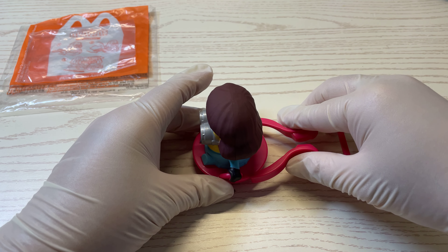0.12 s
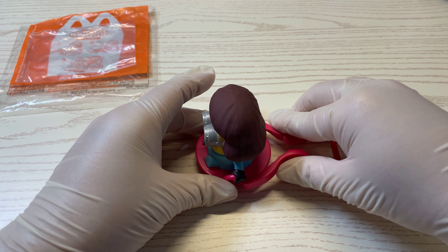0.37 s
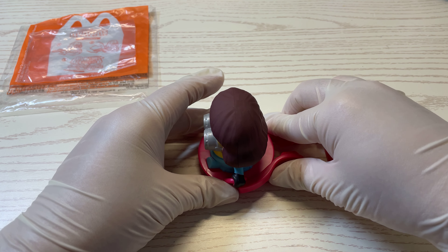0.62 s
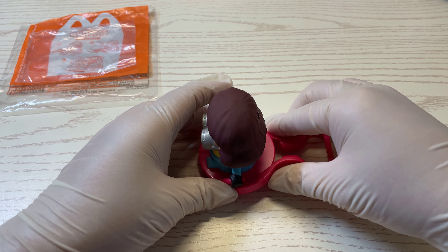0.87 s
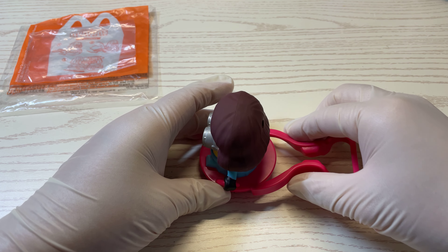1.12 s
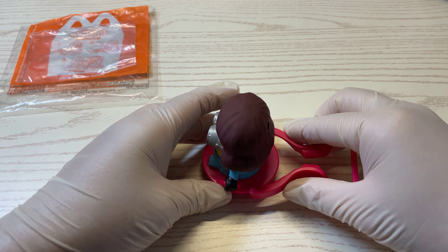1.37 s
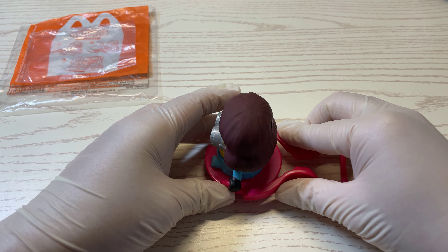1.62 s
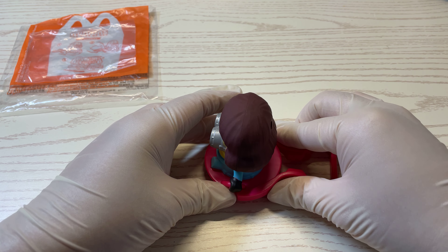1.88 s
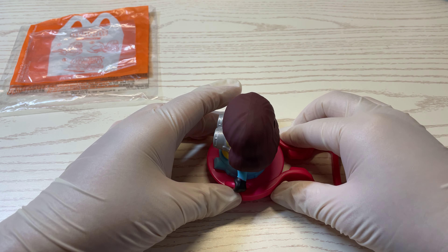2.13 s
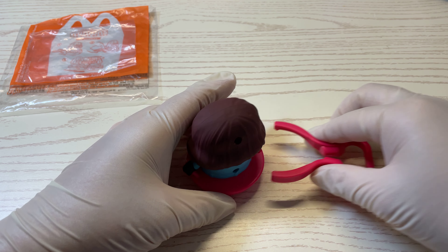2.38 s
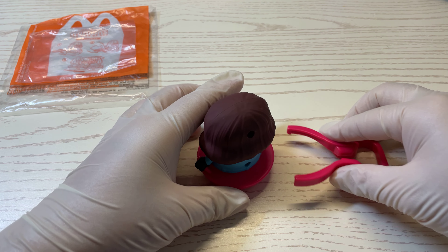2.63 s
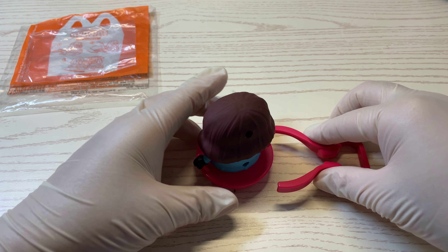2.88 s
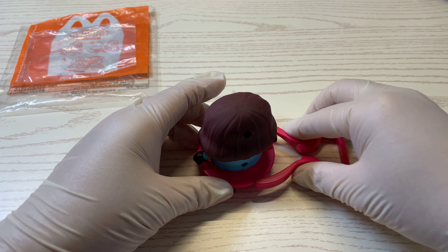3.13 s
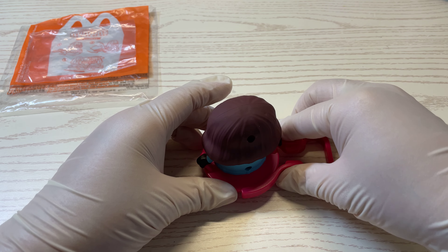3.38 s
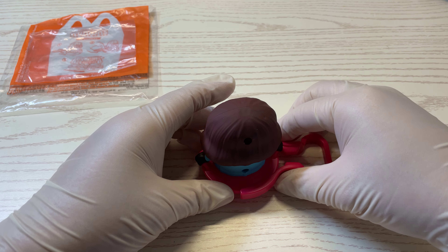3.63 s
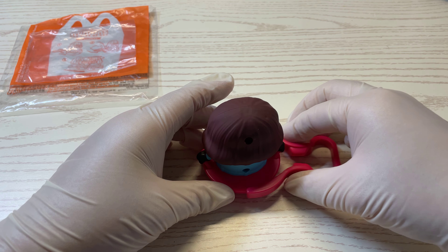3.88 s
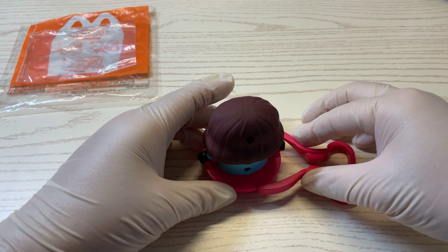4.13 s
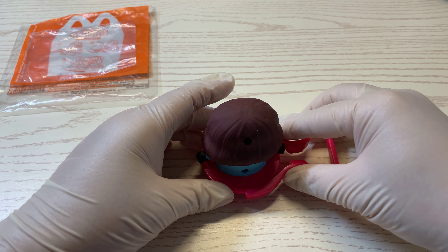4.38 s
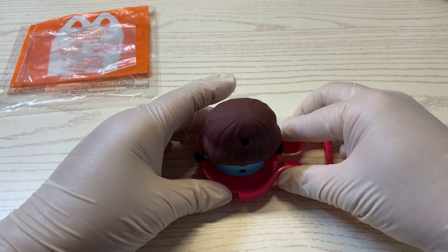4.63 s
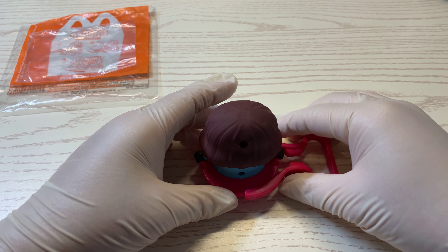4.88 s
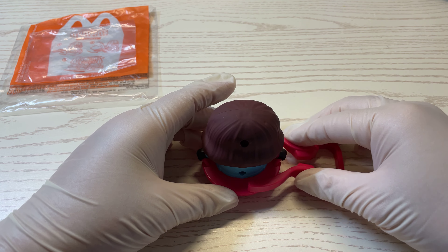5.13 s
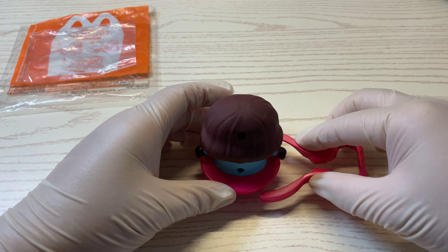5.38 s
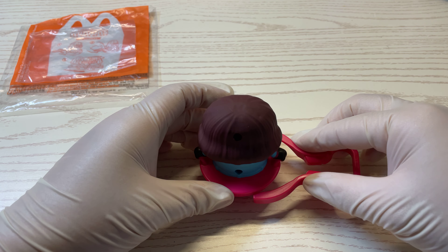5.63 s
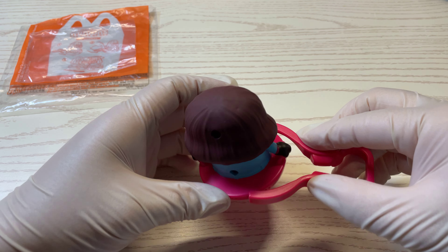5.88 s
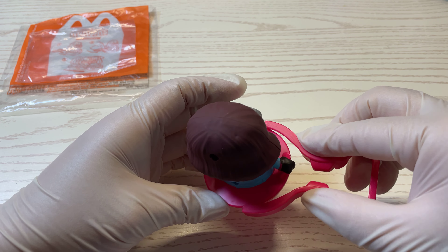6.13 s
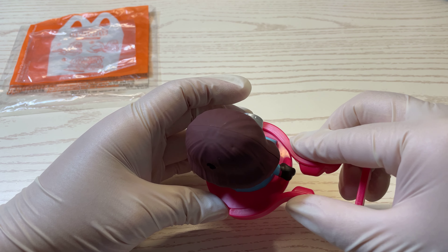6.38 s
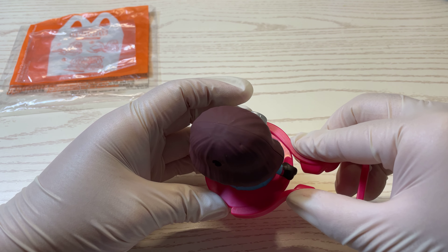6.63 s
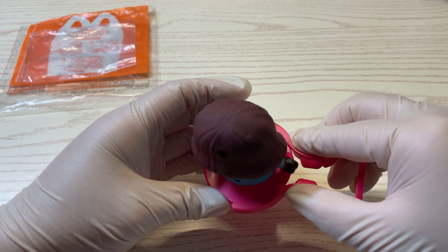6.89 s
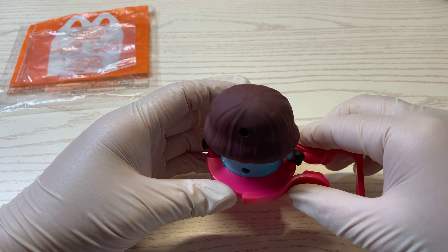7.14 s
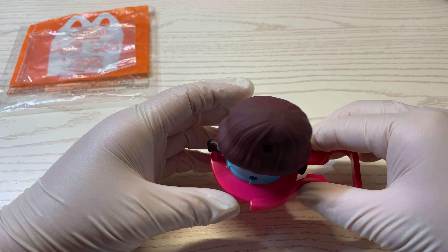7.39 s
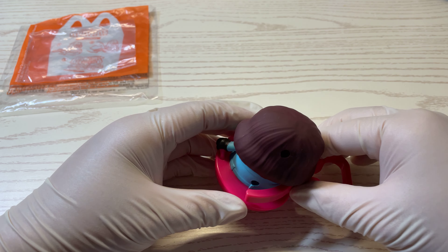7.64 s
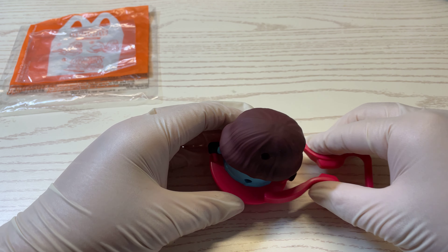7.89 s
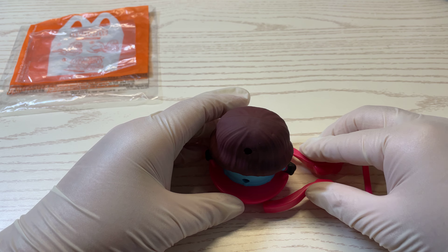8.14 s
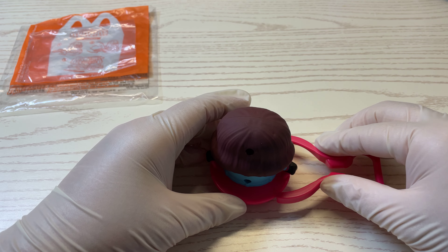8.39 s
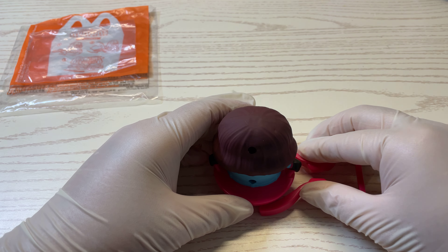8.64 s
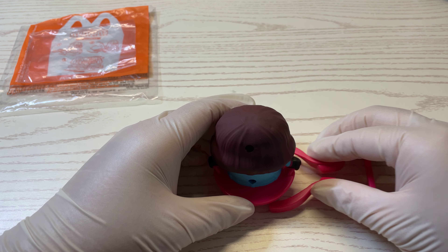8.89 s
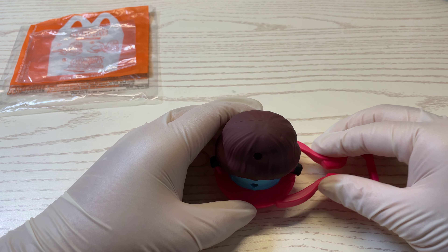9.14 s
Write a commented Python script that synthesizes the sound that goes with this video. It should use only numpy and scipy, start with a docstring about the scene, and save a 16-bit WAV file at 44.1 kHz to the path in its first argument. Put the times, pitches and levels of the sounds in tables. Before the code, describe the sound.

Irregular plastic clicks and tiny rattles, heard close and dry with a slight small-room tail. Soft thumps pass into a wooden table, and the toy's base drags in short hollow squeaks. Rubber gloves rub faintly throughout. Two loud crisp snaps stand out in the middle, and another cluster of snaps and scraping comes late, before a few final taps. A faint low room rumble stays beneath.

```python
"""A quiet room with a wooden table: gloved hands fit a springy plastic clamp round a small hollow plastic toy.
Contacts are clicks and short rattles that ring the modes of the thin shell, the hollow and the table top.
Random slips drag the base now and then; grainy noise and faint scuffs are the gloves, rubbing throughout.
Faint gliding sines whistle high up, and shaped noise lays a low rumble under it all."""
import sys
import numpy as np
from scipy import signal
from scipy.fft import rfft, irfft
from scipy.io import wavfile

SR = 44100
rng = np.random.default_rng(int(sys.argv[2]) if len(sys.argv) > 2 else 0)


def wrap_up_sound(samples):
    """Save the sound to the file named by the first command line argument, as 16-bit audio."""
    columns = np.atleast_2d(samples).T
    # keep every value between -1 and 1, then stretch to whole-number steps
    tamed = np.clip(columns, -1, 1)
    steps = np.round(tamed * 32767).astype(np.int16)
    wavfile.write(sys.argv[1], SR, steps)


def nominal_scale(level):
    """Amplitude ratio for a level in decibels (scalar or array-like)."""
    x = np.asarray(level, float) / 20
    return 10 ** x


N = 408366   # length [samples]


def rms_one(x):
    """Scales to rms 1."""
    return x / np.sqrt(np.mean(x ** 2) + 1e-20)


def in_time(rows):
    """Draws each column of a (time, values...) table as a curve, one value a sample."""
    time_s, *columns = np.transpose(rows)
    return [np.interp(np.arange(N) / SR, time_s, column) for column in columns]


def fade(x, seconds):
    """One-pole smoothing; a unit click spreads over the given time with area 1."""
    r = np.exp(-1 / (seconds * SR))
    return signal.lfilter([1 - r], [1, -r], x + 1e-18)


def high_pass(x, hz):
    """Small parts radiate little below their lowest modes."""
    return signal.sosfilt(signal.butter(3, hz, "high", fs=SR, output="sos"), x)


def octaves(modes, from_hz):
    """Distance of each mode from one pitch, or from a pitch given per blow [octaves]."""
    return np.log2(np.array(modes)[:, 0] / np.reshape(from_hz, (-1, 1)))


def coloured(spectrum):
    """Noise with the given spectrum; rms 1."""
    hz, db = np.transpose(spectrum)
    bins_hz = np.arange(1, N // 2 + 2) * SR / N
    gain = nominal_scale(np.interp(np.log(bins_hz), np.log(hz), db))
    return rms_one(irfft(rfft(rng.standard_normal(N)) * gain, N))


def grains(per_s, spread_db):
    """Stick-slip: random small clicks of uneven size; rms 1."""
    sizes = nominal_scale(spread_db * np.minimum(rng.exponential(1, N), 4)) * rng.choice([-1, 1], N)
    return rms_one(sizes * (rng.random(N) < per_s / SR))


def ring(force, hz, t60):
    """A resonating mode: a unit click sets a sine of height 1 ringing."""
    r, w = nominal_scale(-60 / (t60 * SR)), 2 * np.pi * hz / SR
    return signal.lfilter([0, np.sin(w)], [1, -2 * r * np.cos(w), r * r], force + 1e-18)


def struck(modes, when_s, colour_db, peak_db, scatter_db, click, rattle, rattle_s, rise_s):
    """Each blow is a click and a rattle that swells and dies, shared among the modes; returns rows click, rattle."""
    hz, level_db, t60 = np.transpose(modes)
    at = np.round(when_s * SR).astype(int)
    chance = rng.standard_normal((len(at), len(hz)))
    share = nominal_scale(level_db + colour_db + scatter_db * chance)
    share /= np.sqrt(np.sum(share ** 2, axis=1, keepdims=True))
    # neighbouring modes swing in opposition
    share *= nominal_scale(peak_db)[:, None] * (-1) ** np.arange(len(hz))
    # at rattle 1, the energy of a unit click
    chatter = rattle * np.sqrt(2 * (rattle_s + rise_s) * SR) * rng.standard_normal(N)
    out = 0
    for k in range(len(hz)):
        clicks = np.zeros(N)
        clicks[at] = share[:, k]
        rattling = fade(fade(clicks, rise_s), rattle_s) * chatter
        out = out + ring(np.array([click * clicks, rattling]), hz[k], t60[k])
    return out


def rubbed(modes, force, colour_db=0):
    """A continuing force keeps the modes ringing; rms 1."""
    hz, db, t60 = np.transpose(modes)
    gain = nominal_scale(db + np.ravel(colour_db)) * (-1) ** np.arange(len(hz))
    return rms_one(sum(g * ring(force, f, t) for g, f, t in zip(gain, hz, t60)))


# spectrum of the low rumble: (frequency [Hz], relative level [dB])
RUMBLE_SPECTRUM = [(13, -45.5), (22, -32), (44, -1), (80, -7), (115, -3), (189, -29), (256, -24.5),
                   (524, -28.5), (585, -36), (771, -29), (910, -28.5), (1270, -32), (5610, -72),
                   (13200, -62), (16000, -79)]


def room_tone():
    """Steady noise, heaviest in the bass, at -50.5 dB rms."""
    return nominal_scale(-50.5) * coloured(RUMBLE_SPECTRUM)


def room(x):
    """A diffuse tail: quick echoes off table and hands, then the slower room, a little dull."""
    near_t60_s, room_t60_s, far_db, wall_cut_hz = 0.087, 0.28, -9.5, 9000
    t = np.arange(SR // 2) / SR
    decay = nominal_scale(-60 * t / near_t60_s) + nominal_scale(far_db - 60 * t / room_t60_s)
    tail = rng.standard_normal(len(t)) * decay * (t > .004)
    tail = fade(tail, 1 / (2 * np.pi * wall_cut_hz))
    tail = tail - 0.3 * fade(tail, 1 / (2 * np.pi * 2500))     # the bass comes back weaker
    return signal.fftconvolve(x, tail / np.sqrt(np.sum(tail ** 2)))[:N]


# thin high whistles: (start [s], end [s], first pitch [Hz], last pitch [Hz], peak level before the waver [dB])
WHISTLE_GLIDES = [(0.55, 0.94, 4630, 4900, -81), (0.927, 1.2, 4880, 4830, -72),
                  (1.167, 1.27, 7700, 7650, -88), (1.566, 1.635, 7650, 7650, -84),
                  (1.865, 1.968, 7650, 7700, -90)]


def whistles():
    """Faint sines that glide a little and waver in strength."""
    out = np.zeros(N)
    waver = 1 + .2 * rms_one(fade(fade(rng.standard_normal(N), .01), .01))
    for start_s, end_s, from_hz, to_hz, db in WHISTLE_GLIDES:
        a, b = round(start_s * SR), round(end_s * SR)
        phase = 2 * np.pi * np.cumsum(np.linspace(from_hz, to_hz, b - a)) / SR
        out[a:b] += nominal_scale(db) * np.hanning(b - a) ** 0.065 * np.sin(phase)     # nearly flat, soft ends
    return out * waver


def lead_in():
    """Parts slide into each contact: a swell grows towards it and lets go within milliseconds."""
    swell_s, swell_db, follows = 0.019, -63, 0.1     # follows: share of the contact's dB level
    time_s, shell_db = np.transpose(TOY_CONTACTS)[:2]
    clicks = np.zeros(N)
    clicks[np.round(time_s * SR).astype(int)] = nominal_scale(swell_db + follows * shell_db)
    swell = swell_s * SR * fade(clicks[::-1], swell_s)[::-1]     # smoothed backwards in time
    return fade(swell, 0.004)


# modes of the wooden table top: (frequency [Hz], relative level [dB], decay by 60 dB [s])
TABLE_MODES = [(89, -6.5, 0.15), (120, -1.5, 0.06), (215, -4.5, 0.03), (378.6, -4, 0.04),
               (433, -6.5, 0.079), (560, -2.5, 0.031), (780, -0.5, 0.018)]
# modes of the air and body of the hollow toy: (frequency [Hz], relative level [dB], decay by 60 dB [s])
HOLLOW_MODES = [(985, 0, .04), (1180, -3, .03), (1300, -3, .035), (1390, 0, .08), (1455, 0, .075),
                (1560, 0, .04), (1650, 0, .045), (1820, 0, .04)]
# spectrum of glove on plastic: (frequency [Hz], relative level [dB])
GLOVE_SPECTRUM = [(1180, -32), (2000, -0.5), (2860, -4), (3230, -7.5), (4990, -12), (5630, -19),
                  (7000, -17), (8200, -12), (9500, -19.5), (16000, -20)]
# light rubbing, before its waver: (time [s], hiss level [dB], scuff level [dB])
GLOVE_RUBBING = [(0.0, -76, -59.5), (0.22, -76, -71), (0.44, -68, -63), (0.57, -86, -66),
                 (0.85, -73.5, -64), (1.05, -63, -66), (1.5, -87.5, -71), (1.7, -64.5, -64),
                 (1.92, -85, -67), (2.28, -68, -61), (2.36, -48, -42.5), (2.56, -69, -54.5),
                 (2.85, -68, -61.5), (3.06, -86, -59), (3.35, -67.5, -65), (3.6, -75.5, -64.5),
                 (4.3, -67, -56.5), (4.65, -77.5, -66.5), (5.07, -75, -59), (5.18, -61, -49),
                 (5.35, -72.5, -75.5), (5.6, -82.5, -69.5), (6.1, -80.5, -69), (6.4, -75.5, -67.5),
                 (6.55, -86, -73), (6.9, -79.5, -71.5), (7.5, -84, -70.5), (7.62, -55, -68),
                 (8.0, -82.5, -65), (8.3, -82, -70.5), (8.56, -69.5, -59.5), (8.75, -71, -67.5),
                 (8.86, -81.5, -68), (8.95, -67, -62), (9.26, -73.5, -63)]


def rubbing():
    """Rubber on plastic hisses in grains; light sliding scuffs hollow and table faintly."""
    fidget_s = .03
    fidget_db = 3.0 * rms_one(fade(fade(rng.standard_normal(N), fidget_s), fidget_s))     # random waver
    hiss_db, scuff_db = in_time(GLOVE_RUBBING) + fidget_db
    graininess = rms_one(3.0 + 1.5 * fade(np.abs(grains(per_s=72, spread_db=7.5)), .002))
    hiss = coloured(GLOVE_SPECTRUM) * graininess
    slips = grains(per_s=3700, spread_db=0.0)
    scuff = rms_one(rubbed(HOLLOW_MODES, slips) + 1.3 * rubbed(TABLE_MODES[2:], slips))
    return (nominal_scale(hiss_db) + lead_in()) * hiss + nominal_scale(scuff_db) * scuff


def slide(time_s, length_s, *db):
    """A slide builds up, then lets go: rows for its start, top and end."""
    rise_share, start_db, end_db = 0.32, -16.5, -25.5     # levels relative to the top
    start_s = time_s - rise_share * length_s
    return [(start_s, *np.add(db, start_db)), (time_s, *db), (start_s + length_s, *np.add(db, end_db))]


# modes of the thin plastic shell: (frequency [Hz], relative level [dB], decay by 60 dB [s])
SHELL_MODES = [(2000, -2, .005), (2300, -2, .006), (2600, -3, .007), (2850, -2, .006), (3150, -10, .025),
               (3400, -2, .006), (3600, -8, .018), (3850, -2, .006), (4150, -3, .008), (4500, 0, .004),
               (4900, -1, .005), (5300, -2, .006), (5800, 0, .004), (6420, -1, .005), (7050, 1, .003),
               (7700, 0, .004), (8500, 2, .0025), (9500, 1, .0035), (10400, 2, .0025), (11400, 2, .002),
               (12400, 1, .002), (13400, 0, .002), (14400, 1, .003), (15400, -1, .002), (16200, -4, .003)]
# two long rasps of the base under load, each: (time [s], shell level [dB], hollow level [dB], table level [dB])
BASE_RASPS = [
    [(2.29, -79, -73, -69), (2.312, -85, -42, -48), (2.376, -38.5, -30, -36.5), (2.422, -40.5, -29, -41),
     (2.462, -96, -47, -55), (2.482, -52, -32.5, -43.5), (2.54, -50, -36, -32), (2.62, -74, -77, -54.5)],
    [(8.02, -47, -47.5, -46), (8.072, -41.5, -20.5, -27.5), (8.086, -35.5, -32, -32.5),
     (8.128, -53, -39.5, -33.5), (8.188, -69, -51.5, -50), (8.21, -68, -60, -52)],
]
# short slides of base or clamp:
# (time of most load [s], length [s], shell level [dB], hollow level [dB], table level [dB])
SHORT_SLIDES = [(1.17, 0.088, -62, -48, -42), (2.693, 0.06, -44, -25.5, -35.5), (3.03, 0.11, -77, -63, -66),
                (3.177, 0.25, -63, -53, -51), (3.398, 0.11, -51.5, -43.5, -47),
                (3.711, 0.19, -69.5, -53, -51), (4.008, 0.18, -56.5, -41, -83),
                (4.097, 0.03, -49, -30, -37), (4.379, 0.17, -52.5, -45.5, -66),
                (4.886, 0.048, -59, -45, -62), (4.964, 0.17, -58, -49, -44.5),
                (5.956, 0.17, -60.5, -69, -66), (7.07, .12, -72, -74, -64),
                (7.679, 0.046, -33.5, -30.5, -52), (7.883, 0.12, -48, -35, -30.5),
                (8.587, 0.07, -70, -53, -49), (8.923, 0.16, -59, -52, -53)]


def dragging():
    """One stream of slips drives shell, hollow and table; sliding favours the shell's low squeak and open hollow."""
    slips = grains(per_s=2500, spread_db=4.0)
    squeak_db = 12.0 * np.exp(-(octaves(SHELL_MODES, 3150) / 0.036) ** 2)
    squeak_db = squeak_db - 9.0 * np.abs(octaves(SHELL_MODES, 3300))
    squeak = high_pass(rubbed(SHELL_MODES, slips, squeak_db), 1900)
    scrape = high_pass(rubbed(SHELL_MODES, slips, -3.0 * octaves(SHELL_MODES, 3600)), 1900)
    singing = high_pass(rubbed(HOLLOW_MODES, slips, -32 * np.abs(octaves(HOLLOW_MODES, 1420))), 850)
    scuff = rubbed(HOLLOW_MODES, fade(slips, 0.0006)) + 0.19 * rubbed(TABLE_MODES[4:], slips)
    scuff = high_pass(scuff, 510)
    table = rubbed(TABLE_MODES, fade(fade(slips, 0.0002), 0.0002))     # the table feels only the slow part
    out, t = 0, np.arange(N) / SR
    for rows in BASE_RASPS + [slide(*row) for row in SHORT_SLIDES]:
        sliding = fade(1. * (t > rows[0][0]) * (t < rows[-1][0]), 0.0013)
        shell_db, hollow_db, table_db = in_time(rows)
        # a light slide scuffs broadly, a heavy one sings in the hollow
        load = np.clip((hollow_db + 50) / 16, 0, 1)
        hollow = np.sqrt(load) * singing + np.sqrt(1 - load) * scuff
        shell = np.sqrt(load) * squeak + np.sqrt(1 - load) * scrape
        out = out + sliding * (nominal_scale(shell_db) * shell + nominal_scale(hollow_db) * hollow + nominal_scale(table_db) * table)
    return out


# thumps into the table:
# (time [s], relative level [dB], tilt towards the upper modes [dB], upper mode favoured [Hz])
TABLE_THUMPS = [(0.003, -34.5, 21, 433), (1.163, -28, -35, 447), (1.208, -32, 2, 353),
                (1.312, -23.5, 0, 336), (1.803, -34, -16, 365), (2.226, -36.5, -2, 544),
                (2.325, -23.5, 7, 545), (2.472, -19, -11, 420), (2.69, -14.5, -12, 647),
                (2.817, -31.5, -7, 400), (3.199, -34, -16, 560), (3.402, -28.5, -11.5, 590),
                (3.688, -36, 0, 456), (3.846, -36.5, -17.5, 388), (4.1, -24, -9, 415),
                (4.376, -21, -6, 355), (4.408, -30.5, -7.5, 433), (4.604, -45.5, 0, 523),
                (4.885, -42, 6, 430), (4.951, -34.5, 6, 425), (5.002, -36, 2, 430), (5.172, -29.5, -8, 397),
                (7.594, -22.5, 0.5, 754), (7.867, -17.5, 2, 570), (7.883, -14, -19.5, 590),
                (8.029, -23, 3, 730), (8.049, -31, -4, 424), (8.481, -39, 6, 463), (8.56, -36.5, 2.5, 780),
                (8.95, -33.5, 5.5, 350), (9.142, -27, -0.5, 433), (9.244, -42, 5, 799)]


def thumps():
    """Soft, slow blows on the table top; harder ones reach its upper modes."""
    time_s, db, upper_db, upper_hz = np.transpose(TABLE_THUMPS)
    hardness_db = upper_db[:, None] * np.clip(octaves(TABLE_MODES, 160), 0, 1)
    spot_db = 10.0 * np.exp(-(octaves(TABLE_MODES, upper_hz) / 0.17) ** 2)
    blows = struck(TABLE_MODES, time_s, hardness_db + spot_db, db - 2.5, scatter_db=2.0,
                   click=0.88, rattle=0.91, rattle_s=0.018, rise_s=0.0012)
    return fade(blows, 0.000043)     # softens the top


# contacts on the toy: (time [s], relative shell level [dB], tilt towards the top treble [dB],
# relative hollow level [dB], hollow pitch [Hz])
TOY_CONTACTS = [(0.0834, -29.5, -16, -44.5, 1510), (0.151, -50, -18, -57, 1530),
                (0.4797, -27, -14.5, -46, 1710), (0.6265, -36, -5, -51.5, 1620),
                (0.673, -39, -16, -51.5, 1500), (0.719, -53, -35, -74, 1450),
                (0.9308, -39.5, -11, -49.5, 1530), (0.9858, -45, -16, -51.5, 1310),
                (1.0195, -37, -25, -49.5, 1040), (1.1494, -44, -12, -45.5, 1380),
                (1.27, -41.5, -22, -59, 1880), (1.3007, -31.5, -9, -34, 1250),
                (1.3347, -40, -26, -78, 1330), (1.476, -38.5, -9, -72, 1510), (1.7013, -24, 3.5, -48, 1720),
                (1.7896, -29.5, -16, -49.5, 1900), (1.818, -39.5, -5, -53, 1870),
                (1.8783, -52, -23, -58, 1900), (1.926, -55.5, -30, -63, 1870), (1.9995, -50, -7, -58, 1800),
                (2.078, -38, 0, -51, 1700), (2.1924, -45.5, -10, -51, 1140), (2.3137, -24, 0, -33, 1230),
                (2.465, -20, -5, -26, 1580), (2.526, -37, -5, -40, 1380),
                (2.6756, -22.5, -16.5, -20.5, 1370), (2.8095, -50, -34, -52, 1550),
                (2.9502, -53, -57, -50, 940), (3.004, -38.5, -63, -47, 1280),
                (3.0965, -46.5, -11, -51, 1460), (3.1656, -34, -14, -48, 1060),
                (3.1855, -31.5, -9, -52, 1520), (3.2116, -28, -14.5, -44.5, 1120),
                (3.4045, -23.5, -23, -48, 1900), (3.8877, -46, -29, -53, 1590),
                (3.9704, -46, -29, -59, 1560), (4.0698, -38.5, -21, -60, 1240), (4.0985, -13, 1, -37, 980),
                (4.1114, -22.5, -15, -34, 1110), (4.142, -28, -10, -48, 1590), (4.2238, -28, -7, -49, 1560),
                (4.31, -43, -13, -52, 950), (4.3747, 4.5, 1.5, -22.5, 1414),
                (4.6092, -50, -32, -53.5, 1545), (4.87, -41.5, -36, -40, 1680),
                (4.9427, -41, -17, -44, 1386), (4.994, -40, -12, -46.5, 1670),
                (5.016, -40.5, -30, -48, 947), (5.1545, -24, -25, -52.5, 1540),
                (5.1731, -18, -7.5, -33, 1550), (5.3868, -37.5, -25.5, -43.5, 1300),
                (5.4151, -19, -5, -39.5, 1287), (5.512, -37.5, -16.5, -50.5, 1377),
                (5.7825, -3, 4, -33.5, 1316), (5.923, -48.5, -3.5, -63.5, 1384),
                (6.4305, -34, -13, -50.5, 1652), (6.643, -53.5, -13.5, -62, 1396),
                (7.4589, -57.5, -5, -62, 1277), (7.5934, 3, -1, -24.5, 1288),
                (7.6593, -28, -4, -37.5, 1636), (7.6819, -15.5, -6, -32, 1214),
                (7.745, -37, -11, -60.5, 1360), (7.8636, -20, -16, -25.5, 1650),
                (7.939, -33, -24.5, -56, 1390), (8.019, -19.5, 0, -57, 1400), (8.0272, -14, -7, -37, 957),
                (8.0635, -23, -27, -30, 1390), (8.0857, -20, -38, -28, 1530),
                (8.0993, -21.5, -34, -29.5, 1180), (8.1528, -28.5, -18, -42.5, 1510),
                (8.1873, -36, -20, -57.5, 1540), (8.3503, -39.5, -9, -55, 1540),
                (8.4248, -53.5, -17, -63, 1480), (8.5129, -42.5, -17.5, -58, 1470),
                (8.556, -28.5, -62, -38.5, 1190), (8.635, -42, -36, -48.5, 1100),
                (8.944, -41, -22, -49.5, 1430), (9.1456, -17.5, -4, -39, 1234),
                (9.2227, -30.5, -6, -55, 1134), (9.2494, -17, 2, -39, 1204)]
# the clearest contacts: (time just before the contact [s], pitch at which the shell is brightest [Hz])
BRIGHT_SPOTS = [(0.08, 4120), (0.47, 2500), (0.62, 4200), (0.67, 2530), (0.93, 3940), (1.01, 2860),
                (1.33, 3860), (1.47, 5500), (1.7, 5560), (1.78, 4030), (2.31, 2730), (2.46, 3360),
                (2.67, 3060), (3.4, 2540), (4.09, 2660), (4.22, 3600), (4.37, 2980), (5.15, 2620),
                (5.17, 3180), (5.38, 3550), (5.41, 3560), (5.51, 3530), (5.78, 3600), (6.43, 3800),
                (7.59, 5300), (7.65, 5730), (7.68, 3100), (7.86, 2930), (7.93, 3670), (8.08, 3200),
                (8.55, 2470), (9.14, 4010), (9.24, 4540)]


def contacts():
    """The shell cracks, brightest where touched; the hollow swells just after, on the mode left free by the grip."""
    time_s, shell_db, treble_db, hollow_db, hollow_hz = np.transpose(TOY_CONTACTS)
    # the bright pitch shifts with the place touched: scatter of 0.2 octaves
    bright_hz = 3264 * 2 ** (0.2 * rng.standard_normal(len(time_s)))
    spot_s, spot_hz = np.transpose(BRIGHT_SPOTS)
    bright_hz[np.searchsorted(time_s, spot_s)] = spot_hz     # each belongs to the next contact
    hardness_db = treble_db[:, None] * np.clip(octaves(SHELL_MODES, 3500) / 1.7, 0, 1)
    spot_db = 8.2 * np.exp(-(octaves(SHELL_MODES, bright_hz) / 0.092) ** 2)
    spot_db = spot_db + 0.97 * octaves(SHELL_MODES, 4000)     # a gentle tilt upwards
    grip_db = -45 * np.abs(octaves(HOLLOW_MODES, hollow_hz))
    shell = struck(SHELL_MODES, time_s, hardness_db + spot_db, shell_db + 6, scatter_db=1.5,
                   click=.5, rattle=1, rattle_s=.003, rise_s=.0005)
    hollow = struck(HOLLOW_MODES, time_s, grip_db, hollow_db + 6.0, scatter_db=1.0,
                    click=1.2, rattle=.35, rattle_s=.004, rise_s=0.001)
    # passed on through the base
    table = struck(TABLE_MODES[4:], time_s, 0, hollow_db - 7.5, scatter_db=6.5,
                   click=0.95, rattle=.4, rattle_s=0.0025, rise_s=.0007)
    return table + high_pass(shell, 1500) + high_pass(hollow, 500)


def scene():
    """The toy close by, its room tail, the whistles and the room tone."""
    click, rattle = contacts() + thumps()
    slides = dragging() + rubbing()
    # towards the walls the rattle evens out over all directions
    into_room = nominal_scale(9.5) * click + 0.69 * rattle + slides
    tail = nominal_scale(-14) * room(into_room)
    return (click + rattle + slides + tail + whistles() + room_tone())[None]


def low_pass(x):
    """Removes everything above the highest recorded frequency."""
    return signal.sosfilt(signal.butter(12, 16640, fs=SR, output="sos"), x)


def record(dry):
    """Peaks are rounded towards a ceiling, then the top is cut steeply at 16.5 kHz."""
    ceiling = .93
    rounded = ceiling * np.tanh(dry / ceiling)
    mix = signal.sosfilt(signal.cheby2(12, 60, 16500, fs=SR, output="sos"), rounded)
    return low_pass(mix)


dry = scene()
out = record(dry)
wrap_up_sound(out)
```